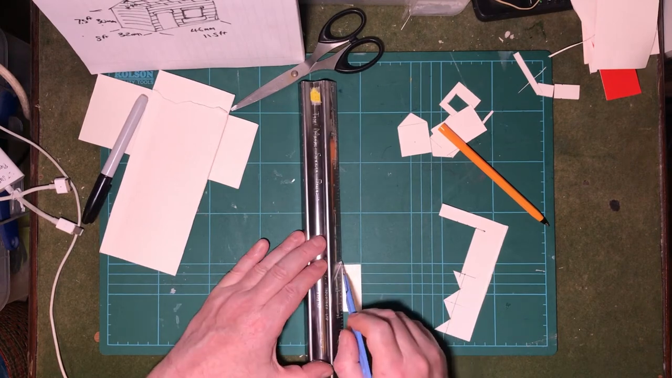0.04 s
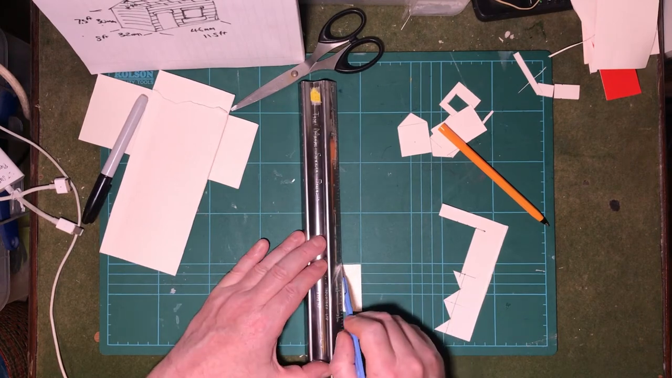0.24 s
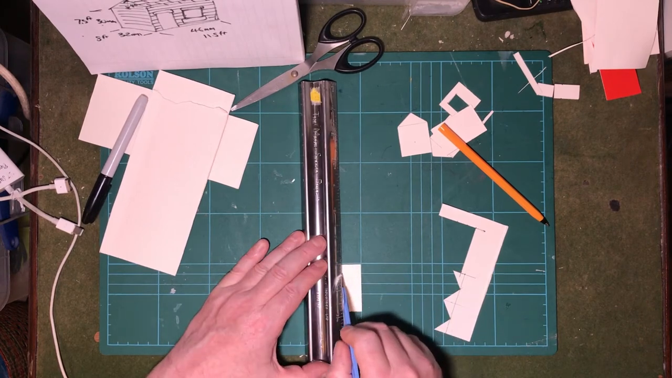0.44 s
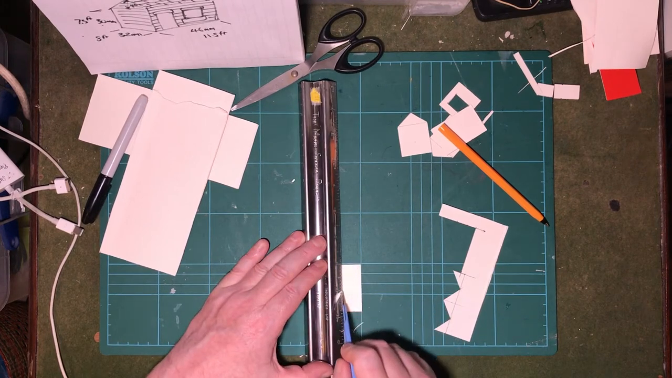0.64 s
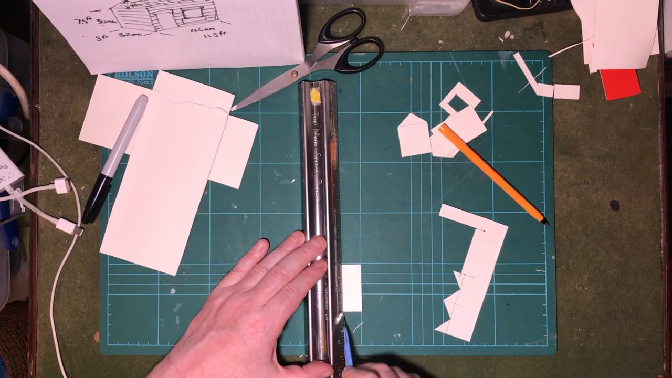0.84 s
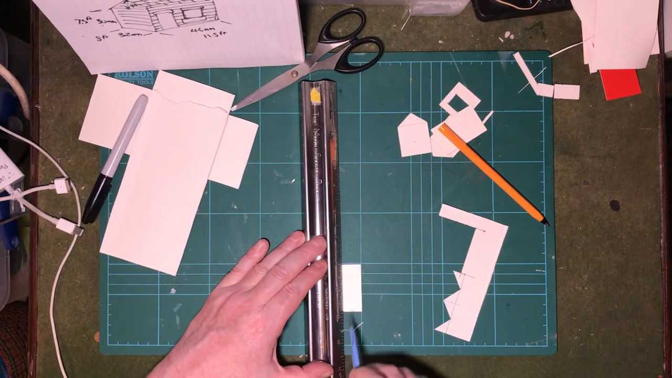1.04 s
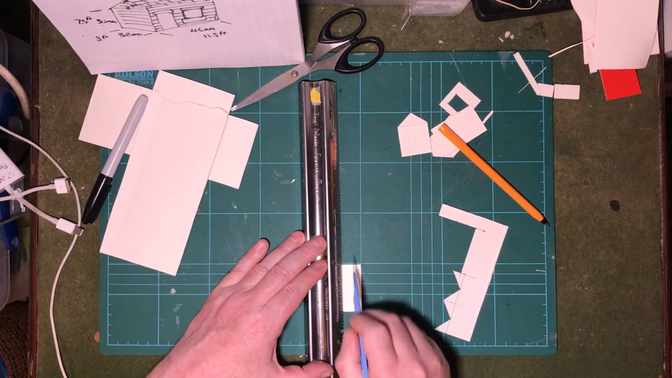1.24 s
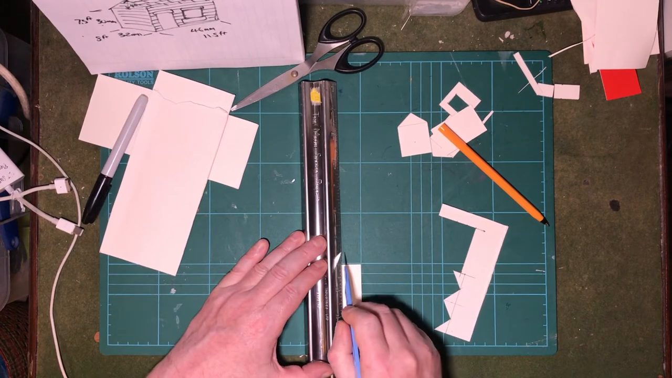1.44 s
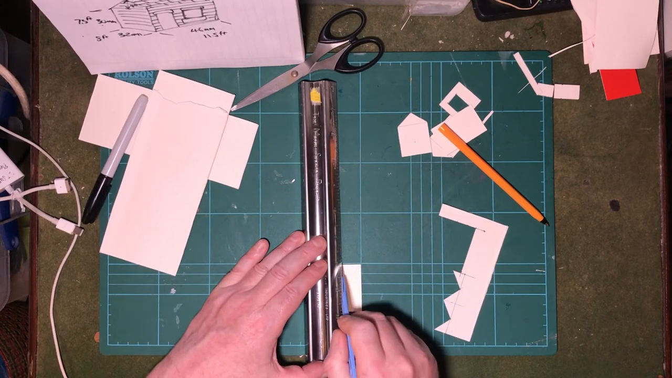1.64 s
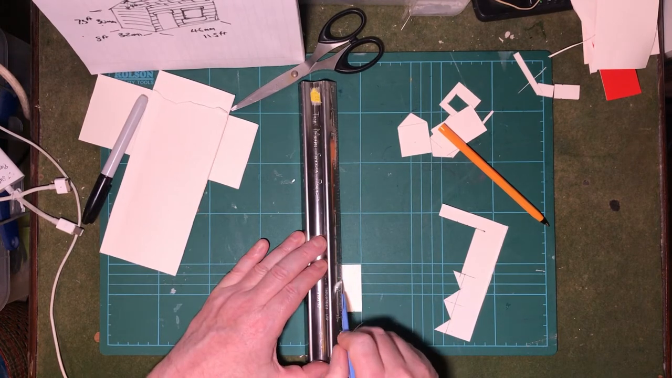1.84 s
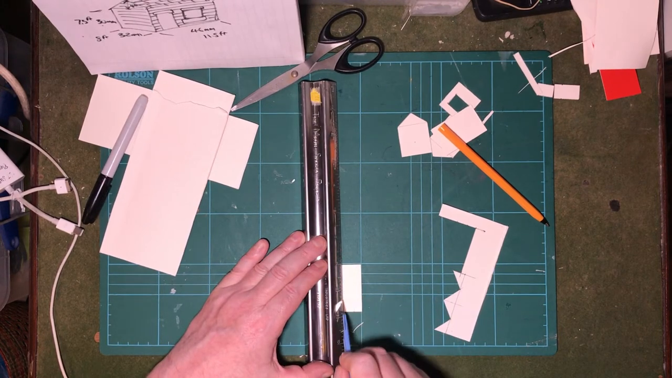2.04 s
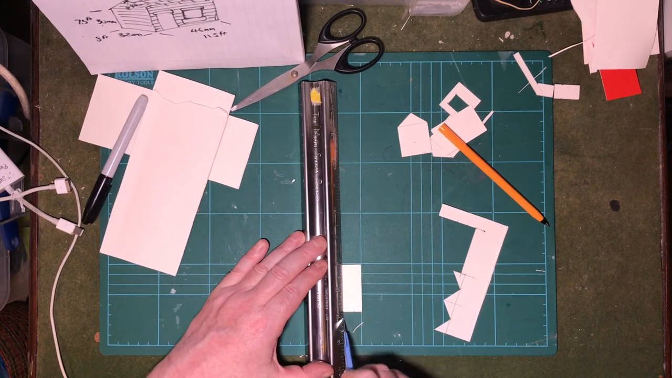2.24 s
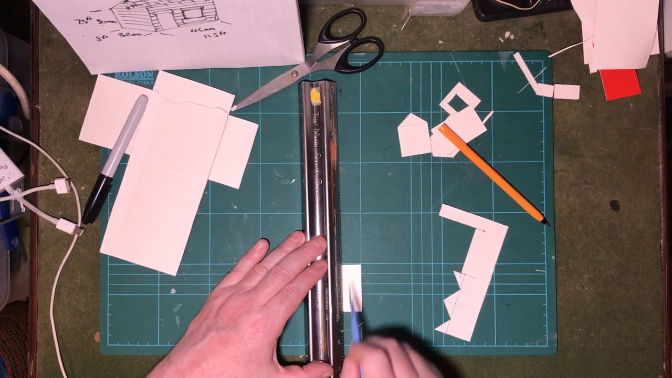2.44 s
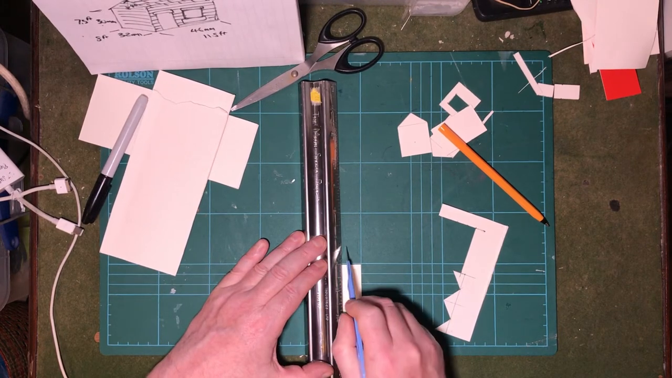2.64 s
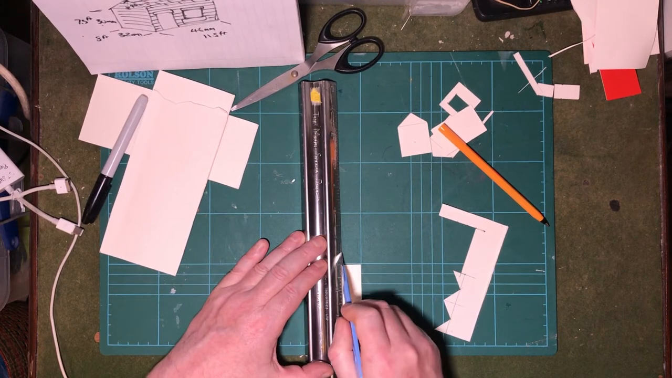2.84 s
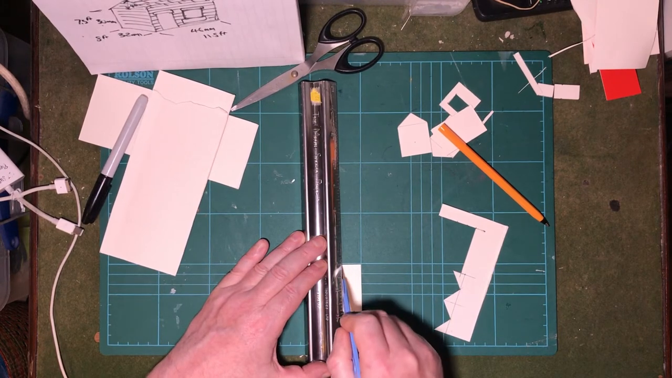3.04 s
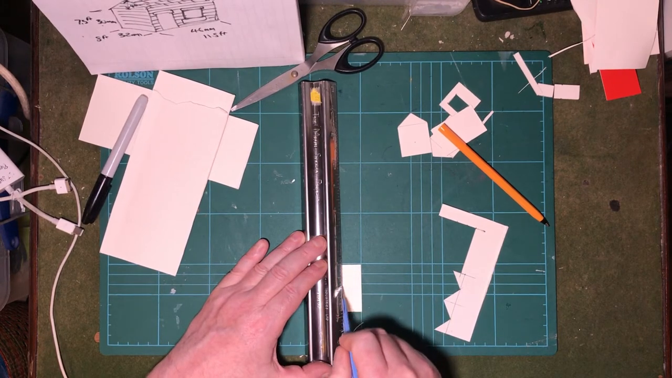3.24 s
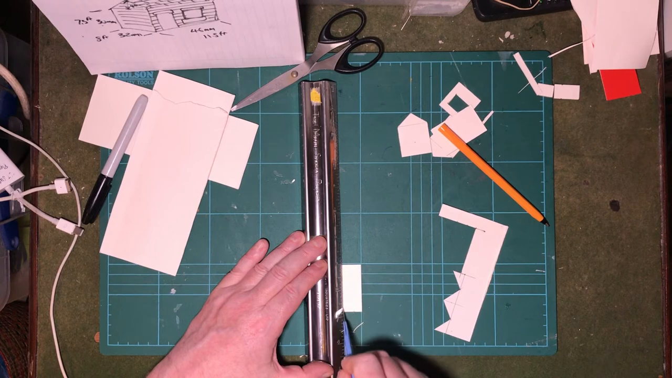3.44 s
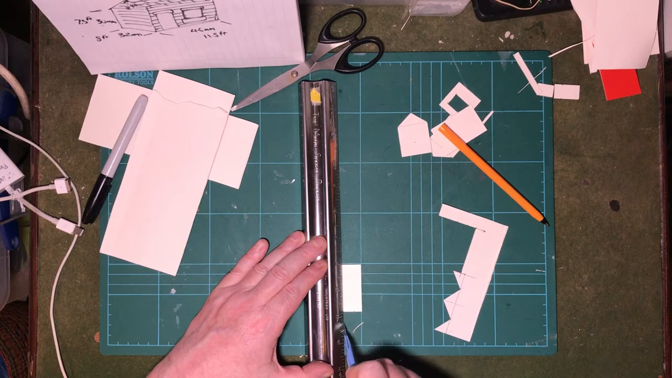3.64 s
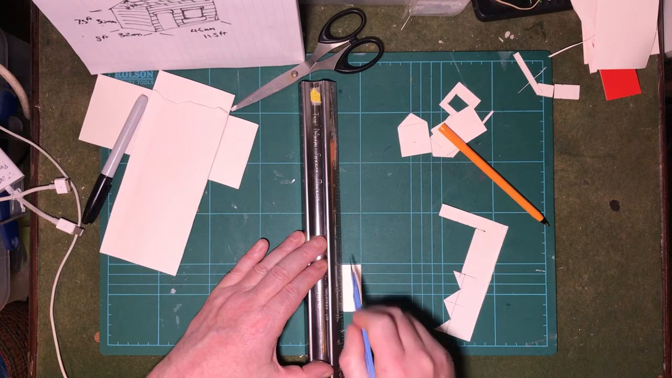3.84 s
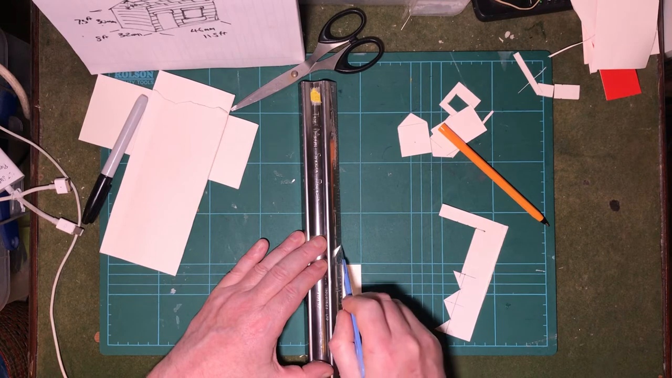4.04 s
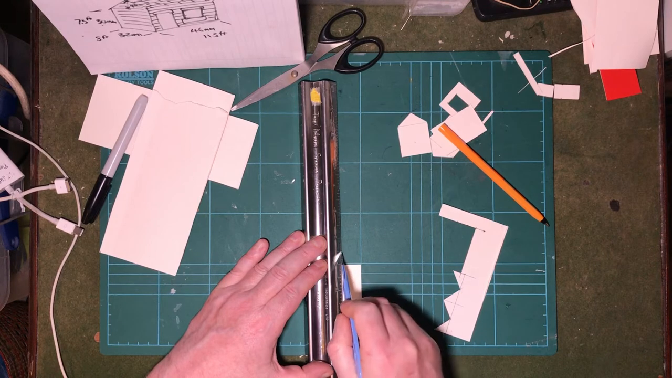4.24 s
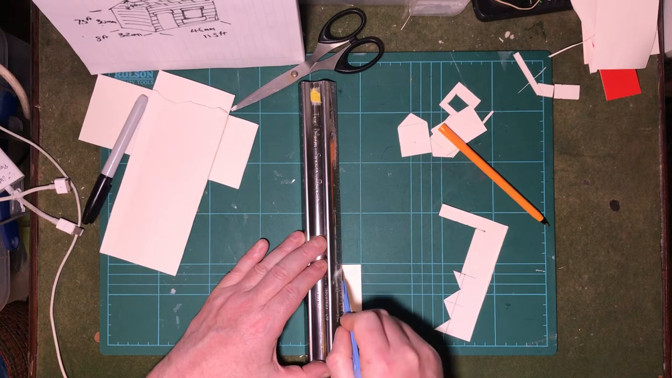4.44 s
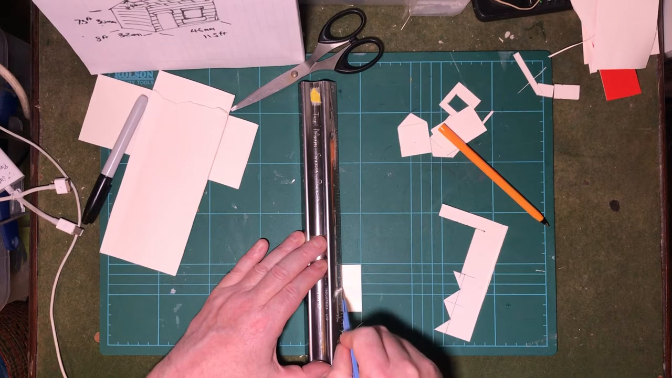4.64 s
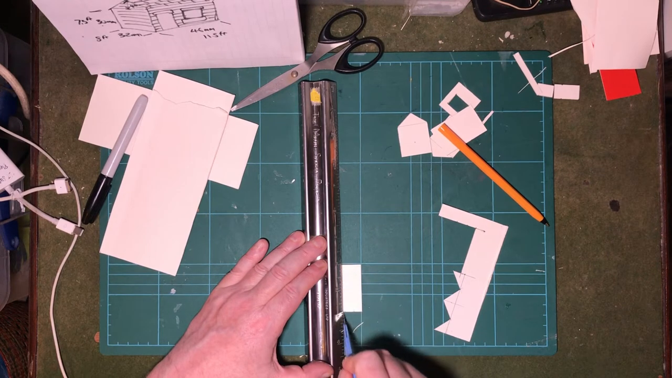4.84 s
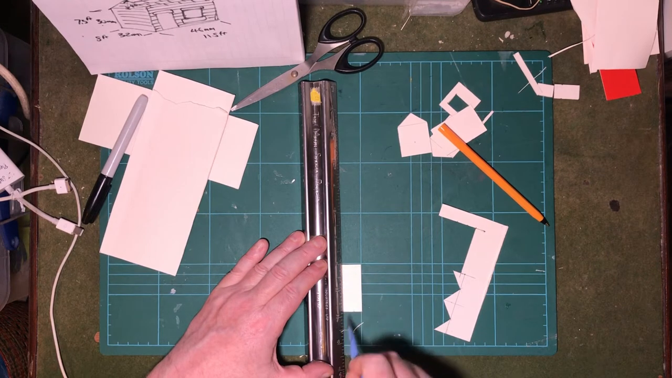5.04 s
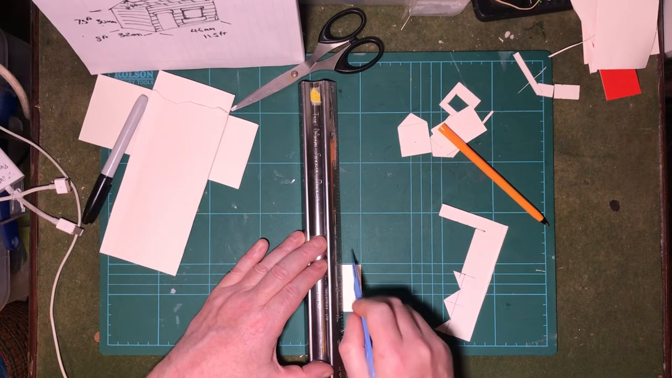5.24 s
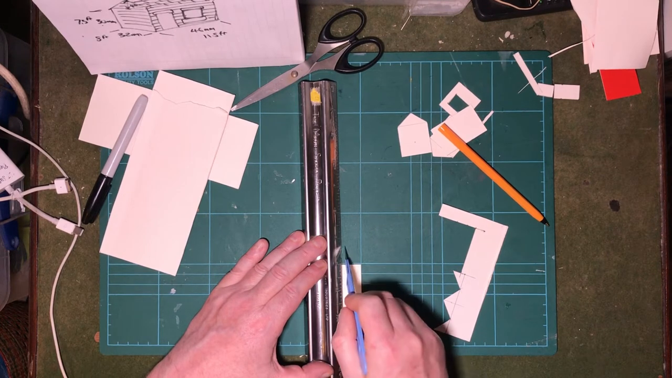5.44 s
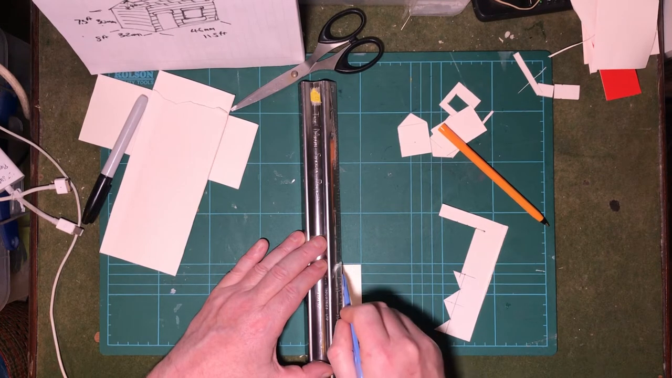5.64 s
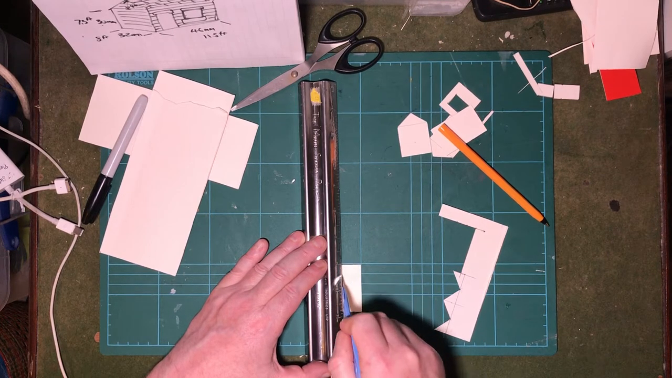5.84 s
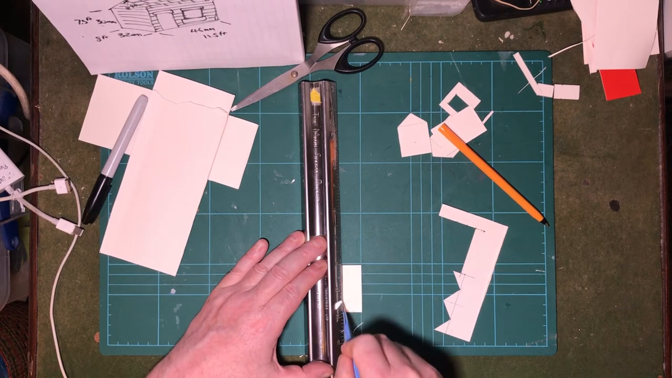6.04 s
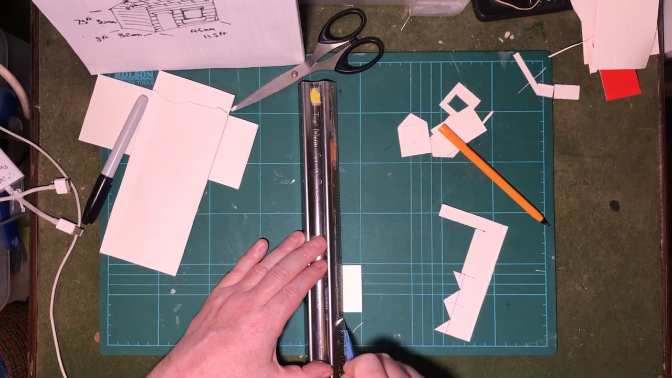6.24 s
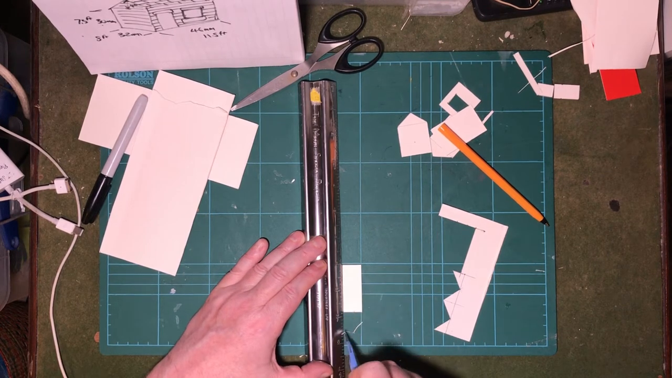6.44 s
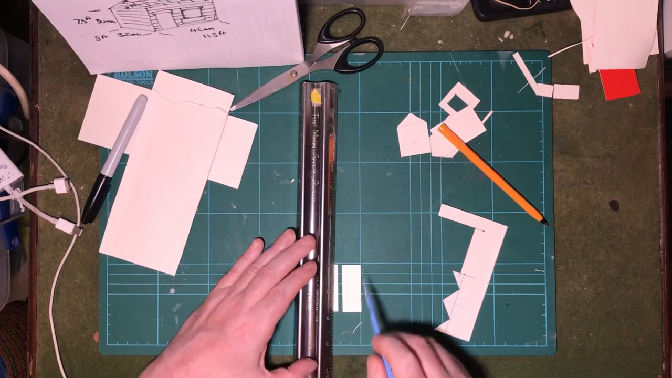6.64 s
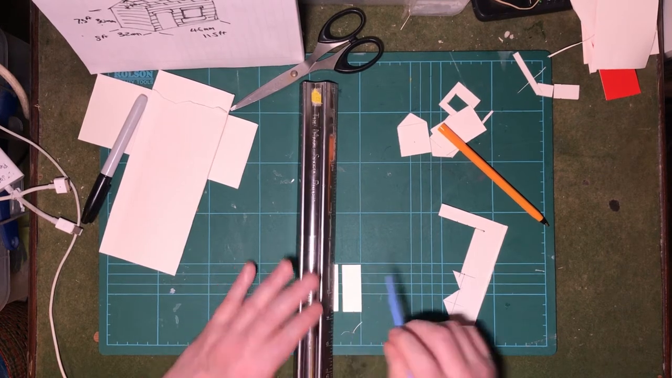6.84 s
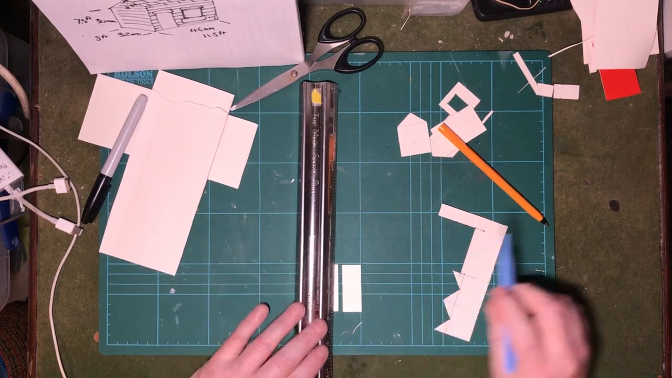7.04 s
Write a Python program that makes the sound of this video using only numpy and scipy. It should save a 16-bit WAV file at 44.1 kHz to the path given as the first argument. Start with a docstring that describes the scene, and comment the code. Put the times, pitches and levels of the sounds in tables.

```python
"""In a small room, a craft knife is drawn five times along a steel rule, through thin card on a cutting mat.
Shaped noise from dense random slips gives the scrape, the ploughed mat, the torn fibres and the desk rumble.
Gritty bursts through resonant bodies give ticks, snaps, knocks and a crack; damped sines give pings and skids.
At the end the rule is nudged and the hands slide away. Room murmur and microphone hiss lie beneath."""
import sys
import numpy as np
from scipy import signal
from scipy.fft import rfft, irfft, next_fast_len
from scipy.io import wavfile
from scipy.ndimage import uniform_filter1d, map_coordinates

SR = 44100
rng = np.random.default_rng(int(sys.argv[2]) if len(sys.argv) > 2 else 0)


def digitize_waveform(pressure):
    """Quantize a signal to 16-bit integers and store it at the path in sys.argv[1].

    Rows of a 2-D input are taken as channels; values are limited to [-1, 1].
    """
    field = np.atleast_2d(pressure).T
    bounded = np.clip(field, -1, 1)
    quanta = np.round(bounded * 32767).astype(np.int16)
    wavfile.write(sys.argv[1], SR, quanta)


N = 313110
TIME_S = np.arange(N) / SR

# Cuts. Each row: blade bites the card [s], bite length [s], lead-in [s], time from bite to mat [s],
# time in the card [s], run-out [s], force at the bite [dB], on reaching the mat [dB], on leaving [dB],
# resistance before the bite [dB], jolt of the bite [dB], tearing [dB], last flick [dB], desk shake [dB].
STROKES = [(0.289, 0.028, .13, 0.26, 0.506, 0.13, -13, -7, -1.5, -3, 6.5, 3.5, -5, -1),
           (1.65, 0.027, 0.16, .27, 0.451, 0.15, -7, -1, 0.5, -1, 0.5, 2.5, -5.5, .5),
           (2.991, .003, 0.24, 0.24, 0.44, 0.14, -2, 3.5, 1.5, -1.5, 2.5, -1, -5.5, -1),
           (4.354, 0.0031, 0.23, 0.18, 0.435, 0.15, -2.5, 0.5, -3.5, -1.5, 4.5, -3, -2, 1.5),
           (5.636, 0.019, 0.259, 0.29, .455, 0.072, -4, -2, -5.5, -3.5, 7, -4.5, -15, 2.5)]

# Contacts. Each row: start [s], level before the group gain [dB], contact decay [s], tilt [dB per octave].
# Steel ticks on steel.
STEEL_TICKS = [(1.4617, -34, 0.0014, -2), (1.481, -30, 0.0093, -3), (2.6765, -27, 0.01, -4),
               (2.698, -34, 0.015, -7), (2.7142, -36, 0.0028, -5.5), (3.582, -38.5, 0.0032, -1),
               (4.9367, -36.5, 0.0015, -1), (6.3688, -37, 0.003, -5), (6.5656, -37.5, .002, 24),
               (6.619, -44, 0.0011, 2)]
# Blade catches and snaps free.
BLADE_SNAPS = [(0.906, -48, 0.0076, 5), (2.0945, -39, 0.0047, -4.5), (2.2425, -50, 0.002, 2),
               (2.9912, -48.5, 0.0023, -4), (3.539, -47.5, 0.0097, -3), (3.957, -36.5, 0.0089, -3),
               (3.963, -35, .0022, -4.5), (3.9968, -44.5, 0.0076, -5), (4.68, -40.5, 0.0022, -8.5),
               (4.8664, -49.5, 0.0079, 0), (4.8998, -42, 0.015, -0.5), (5.5172, -49, 0.0024, -4.5),
               (5.5823, -52, 0.0024, -7), (5.8223, -41, 0.0027, -8)]
# Dull knocks on the rule and mat.
DULL_KNOCKS = [(1.343, -43, 0.00045, -1), (1.462, -41, 0.0055, 0), (2.5845, -45, 0.00086, -2),
               (2.68, -36, 0.0078, -1), (2.7145, -42, .004, .5), (3.964, -39, 0.0019, -1.5),
               (4.041, -50.5, 0.0022, 1), (5.2792, -42.5, 0.0019, -4.5), (6.3988, -33.5, 0.0053, 0),
               (6.481, -32.5, 0.0067, -3)]
# Blade breaks through the far edge of the card.
EDGE_BREAKS = [(0.7817, -25, 0.0007, 1), (0.7828, -21, .0016, -0.5)]

# Blade springs free and pings. Each row: start [s], level [dB].
BLADE_PINGS = [(3.581, -40), (3.966, -32), (4.939, -38)]
# Side of the hand skids in shudders. Each row: start [s], level before the group gain [dB],
# length [s], mean slip rate [slips per s].
HAND_SKIDS = [(1.79, -49, 0.03, 81), (1.91, -36, 0.027, 238), (5.821, -42.5, 0.013, 203),
              (5.948, -42.5, 0.022, 130), (6.036, -39, 0.013, 260), (6.324, -49.5, 0.027, 230),
              (6.693, -42.5, 0.029, 145), (6.711, -40.5, 0.018, 247)]

# Colours. Each row: frequency [Hz], relative level [dB].
# Modes, the resonances above a colour. Each row: centre [Hz], width [Hz], added resonant gain [dB].
# Blade on the rule: colour, modes.
SCRAPE_COLOUR = [(100, -27.5), (350, -1.5), (700, -4), (1150, -1.5), (1900, -10.5), (3300, -6.5),
                 (4500, -14), (6500, -10), (9000, -19.5), (16000, -22)]
SCRAPE_MODES = [(523, 16, 9.5), (868, 25, 3.5), (1140, 360, -3), (1565, 76, 7.5), (3060, 85, 14),
                (3516, 100, 10), (3810, 75, 10.5), (5700, 150, 9)]
# Blade in the mat: colour, modes.
GROOVE_COLOUR = [(100, -31), (400, -3), (800, -6.5), (1600, -6.5), (2400, -6.5), (3300, -15), (4600, -12),
                 (5900, -12), (7500, -17.5), (16000, -22)]
GROOVE_MODES = [(503, 23, 3.7), (1493, 47, 3.2), (2345, 79, 1), (2400, 65, 9.7), (5510, 110, 7.9),
                (5830, 220, 6.9)]
# Tearing card fibres: colour, modes.
FIBRE_COLOUR = [(500, -59), (3000, -2.5), (5500, -6), (8500, -5), (10000, -6.5), (13000, -0.5),
                (15000, -3.5), (16000, -46)]
FIBRE_MODES = [(6630, 110, 8), (7370, 230, 5.5), (9130, 120, 10), (8500, 540, 3)]
# Rumbling desk: colour, modes.
DESK_COLOUR = [(25, -40), (55, -3), (78, 4.5), (120, 1), (200, -3.5), (270, -12.5), (350, -4.5),
               (600, -24.5), (1500, -33.5)]
DESK_MODES = [(156.6, 27, -0.78)]
# Ticking steel: colour, modes.
STEEL_COLOUR = [(300, -27.5), (1400, -10.5), (2300, -12.5), (3600, 0), (5600, -2.5), (7000, 10), (8200, 1),
                (9300, -2), (10300, -1), (14000, 3.5), (16000, -12.5)]
STEEL_MODES = [(1372, 61, 10), (6680, 65, 4.1), (7150, 26, 1.3), (8080, 180, 12), (8600, 60, 2.1),
               (10100, 98, 8.1)]
# Snapping blade: colour, modes.
SNAP_COLOUR = [(200, -24), (1000, -7.5), (2000, -5), (3300, 2), (4600, 4), (5800, 6), (8000, 1.5),
               (16000, -8.5)]
SNAP_MODES = [(848, 54, 9.2), (2410, 84, 1.8), (3010, 140, 11.2), (3510, 110, 3.2)]
# Knocked rule and mat: colour, modes.
KNOCK_COLOUR = [(60, -8.5), (200, -7), (550, 0.5), (1000, 0), (1350, 4.5), (2100, -7.5), (2700, -16),
                (3600, -5), (8000, -22), (16000, -18)]
KNOCK_MODES = [(544, 12, 9.6), (890, 19, 0.84)]
# Rule chattering on the mat: colour, modes.
RULE_COLOUR = [(40, -6), (90, 13.5), (380, 4), (700, -11.5), (1300, 1), (1900, -14.5), (2600, -4.5),
               (3700, -17), (6500, -10.5), (10000, -23.5), (16000, -31)]
RULE_MODES = [(1126, 87, 1.9), (1456, 11, 17.6), (1470, 60, 2.6), (2247, 43, 17), (2700, 96, 2.8),
              (3120, 46, 20), (3544, 48, 10.5), (3960, 100, 9.4), (5200, 20, 15), (6420, 25, 11),
              (7520, 29, 8.3)]
# Colours alone: sliding skin, its hiss, knife tip on the mat, crack of the card edge, room murmur and hiss.
SKIN_COLOUR = [(22, 22.5), (45, -4), (130, 14.5), (300, 2), (450, -4), (900, -8), (1300, -0.5),
               (1600, -9.5), (2000, -0.5), (3200, -7), (4100, -9.5), (4600, -8), (5600, -16), (16000, -20)]
SKIN_HISS_COLOUR = [(2000, -5.5), (5500, -1), (8500, -6), (11000, -13), (16000, -27)]
TIP_COLOUR = [(200, -3), (520, 0), (700, -5), (1400, -2), (2300, -2), (4200, -11), (6200, -9),
              (10000, -20.5), (16000, -24)]
BREAK_COLOUR = [(200, -22.5), (900, -21.5), (1500, -7), (2600, -9), (3300, -2.5), (4600, -11), (5300, 1.5),
                (5900, 0), (6800, -9), (16000, -21)]
FLOOR_COLOUR = [(20, 2.5), (30, -50), (55, -20.5), (75, -10), (140, -13.5), (220, -18.5), (420, -28.5),
                (900, -30.5), (1500, -33), (5000, -36.5), (8000, -34), (12100, -30.5), (16000, -36)]

# Single rubs. Each row: start [s], attack [s], hold [s], decay [s].
# Blade brushes the rule before the first cut.
FALSE_START = (0.173, 0.04, 0.0084, 0.0085)
# Knife tip drags off the mat.
TIP_DRAG = (6.185, 0.051, 0.037, 0.02)
# Rule breaks loose, then shifts on the mat.
RULE_JERK = (6.397, 0.0017, 0.0077, .008)
RULE_SHIFT = (6.40, 0.027, 0.015, 0.049)
# Hands slide away, fingertips leave the rule, palm brushes the mat.
HAND_SLIDE = (6.667, 0.0063, 0.38, .9)
FINGER_PEEL = (6.667, 0.0013, .01, 0.043)
PALM_BRUSH = (6.75, 0.068, 0.031, 0.027)

# Hand leans in before the bite, eases off after the card.
TOUCH_DB, EASE_DB, LIFT_S = -11, -11, 0.015
# Less resistance past the card; coming out takes a moment.
RUN_OUT_DB, EXIT_S = -3.5, 0.018
# Jolt of the bite dies away; far edge of the card holds the blade briefly.
JOLT_DECAY_S, EDGE_DB, EDGE_WIDTH_S = 0.036, -3.5, 0.016
# Last flick swells just before the lift.
FLICK_LEAD_S, FLICK_WIDTH_S = 0.036, 0.027
# Tip sinks into the mat: groove grows, scrape gives way, tearing thins out.
SINK_S, SHALLOW_DB, SUNK_SCRAPE_DB = 0.075, -9, -2.5
SUNK_TEAR_DB, TEAR_FADE_DB_PER_S = -1.5, -9


def undb(db):
    """Decibels to gain."""
    return 10 ** (np.asarray(db) / 20)


def unit(x):
    """Scale to rms 1."""
    return x / np.sqrt(np.mean(x ** 2) + 1e-20)


def walk(rate_hz):
    """Smooth random wandering, rms 1."""
    hold = max(int(SR / rate_hz), 1)
    steps = np.repeat(rng.standard_normal(N // hold + 1), hold)
    return unit(uniform_filter1d(steps, hold)[:N])


def rise(start_s, length_s):
    """Straight fade from 0 to 1."""
    return np.clip((TIME_S - start_s) / length_s, 0, 1)


def swell(peak_s, width_s):
    """Smooth bump of height 1."""
    return np.exp(-((TIME_S - peak_s) / width_s) ** 2)


def rub(start_s, attack_s, hold_s, decay_s):
    """Envelope of one rub: linear attack, hold, exponential decay."""
    since_hold_s = np.maximum(TIME_S - start_s - attack_s - hold_s, 0)
    return rise(start_s, attack_s) * np.exp(-since_hold_s / decay_s)


def add(out, start_s, sound):
    """Mix a short sound into out."""
    start = int(start_s * SR)
    out[start:start + len(sound)] += sound[:N - start]


def high_pass(x, cutoff_hz):
    """Second-order low cut."""
    return signal.sosfilt(signal.butter(2, cutoff_hz, "high", fs=SR, output="sos"), x)


def body(x, colour, modes=(), tilt_db_per_octave=0):
    """Filter x by a minimum-phase colour with ringing resonances on top; rms 1."""
    size = 2 * next_fast_len(len(x) // 2 + 1)
    f_hz = np.maximum(np.arange(size // 2 + 1) * SR / size, 1)
    hz, db = np.transpose(colour)
    octaves = np.log2(np.maximum(f_hz, hz[0]) / hz[0])
    colour_db = np.interp(np.log(f_hz), np.log(hz), db) + tilt_db_per_octave * octaves
    # folding the cepstrum makes the colour causal
    cepstrum = irfft(np.log(undb(colour_db)))
    cepstrum[1:size // 2] *= 2
    cepstrum[size // 2 + 1:] = 0
    ring = 1
    for centre_hz, width_hz, peak_db in modes:
        damping = 1j * f_hz * width_hz
        ring = ring + undb(peak_db) * damping / (centre_hz ** 2 - f_hz ** 2 + damping)
    return unit(irfft(rfft(x, size) * np.exp(rfft(cepstrum)) * ring)[:len(x)])


def friction(slips_per_s, spread_db):
    """Dense tiny slips: random impulses of either sign and uneven size."""
    slips = rng.random(N) < slips_per_s / SR
    return slips * rng.choice([-1, 1], N) * undb(spread_db * rng.standard_normal(N))


def drift(x, depth=0.014, rate_hz=7):
    """Resonances wander as the point of contact travels: playback speed varies."""
    place = np.arange(N) + np.cumsum(depth * walk(rate_hz))
    return map_coordinates(x, [place], order=3, mode="mirror")


def room_floor(level_db=-56):
    """Low room murmur and microphone hiss: steady coloured noise."""
    return undb(level_db) * body(rng.standard_normal(N), FLOOR_COLOUR)


def room(x, t60_s=0.19, wet_db=-13, near_db=-10, near_decay_s=0.0017):
    """Things on the desk scatter the treble; then the short tail of a furnished room."""
    t_s = TIME_S[:SR // 3]
    near = rng.standard_normal(len(t_s)) * np.exp(-t_s / near_decay_s) * (t_s > 0.002)
    near = high_pass(near, 1000)
    tail = rng.standard_normal(len(t_s)) * np.exp(-np.log(1000) * t_s / t60_s) * (t_s > 0.007)
    echoes = (undb(near_db) * unit(near) + undb(wet_db) * unit(tail)) / np.sqrt(len(t_s))
    return x + signal.fftconvolve(x, echoes)[:N]


def letting_go(jerk_db=-34, rule_db=-33.5, skin_db=-51, palm_db=-56, peel_db=-46, brush_db=-57):
    """Rule chatters over the mat and rings; skin brushes away over mat and card."""
    shift = undb(jerk_db) * rub(*RULE_JERK) + undb(rule_db) * rub(*RULE_SHIFT)
    slide = undb(skin_db) * rub(*HAND_SLIDE) + undb(palm_db) * rub(*PALM_BRUSH)
    hiss = undb(peel_db) * rub(*FINGER_PEEL) + undb(brush_db) * rub(*PALM_BRUSH)
    rule = body(friction(6000, 1.8), RULE_COLOUR, RULE_MODES)
    skin = body(friction(12000, 2.6), SKIN_COLOUR)
    skin_hiss = body(friction(4000, 2), SKIN_HISS_COLOUR)
    return shift * rule + slide * skin + hiss * skin_hiss


def skids(gain_db=-7, thud_hz=255, thud_decay_s=0.0021, jitter=0.211):
    """Skin sticks and slips on the mat; every slip is a damped thud in the desk."""
    out, t_s = np.zeros(N), TIME_S[:SR // 8]
    thud = np.sin(2 * np.pi * thud_hz * t_s) * np.exp(-t_s / thud_decay_s)
    for start_s, level_db, length_s, slips_per_s in HAND_SKIDS:
        chance = rng.standard_normal((16, 2))
        slips_s = np.cumsum(np.abs(1 + jitter * chance[:, 0])) / slips_per_s
        shudder = np.zeros(len(t_s))
        for at_s, size in zip(slips_s - slips_s[0], chance[:, 1]):
            fade = np.clip((length_s - at_s) * slips_per_s, 0, 1)
            shudder += undb(2 * size) * fade * np.interp(t_s - at_s, t_s, thud, left=0)
        # the desk top radiates almost no deep bass
        add(out, start_s, undb(level_db + gain_db) * unit(high_pass(shudder, 70)))
    return out


def pings(bending_hz=4110, t60_s=0.037):
    """Thin blade rings briefly in its bending mode: a damped sine."""
    out, t_s = np.zeros(N), TIME_S[:SR // 4]
    ring = np.sin(2 * np.pi * bending_hz * t_s) * np.exp(-np.log(1000) * t_s / t60_s)
    for start_s, level_db in BLADE_PINGS:
        add(out, start_s, undb(level_db) * ring)
    return out


def hits(rows, colour, modes, gain_db):
    """Each contact is a brief gritty burst that rings the struck body."""
    out, t_s = np.zeros(N), TIME_S[:SR // 8]
    attack = 1 - np.exp(-(t_s / 0.0008) ** 2)
    for start_s, level_db, decay_s, tilt in rows:
        burst = rng.choice([-1, 1], len(t_s)) * attack * np.exp(-t_s / decay_s)
        add(out, start_s, undb(level_db + gain_db) * body(burst, colour, modes, tilt))
    return out


def stroke(bite_s, entry_s, lead_s, sink_s, cut_s, run_s, bite_db, mat_db, leave_db,
           approach_db, jolt_db, tear_db, flick_db, shake_db):
    """Hand force through one cut sets four gains: on the rule, in the mat, in the card, on the desk."""
    touch_s, mat_s, leave_s = bite_s - lead_s, bite_s + sink_s, bite_s + cut_s
    lift_s = leave_s + run_s
    contact = rise(touch_s, LIFT_S) * (1 - rise(lift_s, LIFT_S))
    force_db = np.interp(TIME_S, [touch_s, bite_s, mat_s, leave_s, lift_s],
                         [bite_db + TOUCH_DB, bite_db, mat_db, leave_db, leave_db + EASE_DB])
    force = contact * undb(force_db)

    bitten = rise(bite_s, entry_s)
    sunk = rise(mat_s - SINK_S, SINK_S)
    past_card = rise(leave_s, EXIT_S)
    load = force * undb(approach_db * (1 - bitten) + RUN_OUT_DB * past_card)
    jolt = undb(jolt_db * rub(bite_s, entry_s, JOLT_DECAY_S, JOLT_DECAY_S))
    edge = undb(EDGE_DB) * swell(leave_s - EDGE_WIDTH_S / 2, EDGE_WIDTH_S)
    flick = contact * undb(flick_db) * swell(lift_s - FLICK_LEAD_S, FLICK_WIDTH_S)
    thinning_db = TEAR_FADE_DB_PER_S * np.maximum(TIME_S - mat_s, 0)
    tearing = undb(tear_db + SUNK_TEAR_DB * sunk + thinning_db)

    on_rule = load * jolt * undb(SUNK_SCRAPE_DB * sunk)
    in_mat = load * (undb(SHALLOW_DB * (1 - sunk)) + edge) + flick
    in_card = force * np.sqrt(jolt) * tearing * bitten * (1 - past_card)
    on_desk = force * undb(shake_db)
    return on_rule, in_mat, in_card, on_desk


def cutting(scrape_db=-48, groove_db=-48, fibre_db=-50.5, rumble_db=-49, tip_db=-43.5,
            false_start_db=-12, catch_db=1.96, wobble_db=0.66, patch_db=1.0):
    """Blade scrapes the rule, ploughs the mat and tears fibres; its drag shakes the desk."""
    on_rule, in_mat, in_card, on_desk = np.sum([stroke(*row) for row in STROKES], axis=0)
    on_rule = on_rule + undb(false_start_db) * rub(*FALSE_START)
    grip = undb(catch_db * walk(260))  # uneven card holds and frees the blade
    lean = undb(wobble_db * walk(35))  # knife rocks between the rule's edge and the card
    patches = undb(patch_db * walk(22))  # thicker and thinner clumps of fibre

    scrape = drift(body(grip * lean * friction(9000, 2.9), SCRAPE_COLOUR, SCRAPE_MODES))
    groove = drift(body(grip * friction(3500, 3.8), GROOVE_COLOUR, GROOVE_MODES))
    fibres = body(grip * patches * friction(6000, 4.2), FIBRE_COLOUR, FIBRE_MODES)
    rumble = body(friction(2500, 2.3), DESK_COLOUR, DESK_MODES)
    tip = body(friction(6000, 3.1), TIP_COLOUR)
    return (undb(scrape_db) * on_rule * scrape
            + undb(groove_db) * in_mat * groove
            + undb(fibre_db) * in_card * fibres
            + undb(rumble_db) * on_desk * rumble
            + undb(tip_db) * rub(*TIP_DRAG) * tip)


def scene():
    """All the handwork in the room, over the murmur and hiss."""
    ticks = hits(STEEL_TICKS, STEEL_COLOUR, STEEL_MODES, gain_db=-13.5)
    snaps = hits(BLADE_SNAPS, SNAP_COLOUR, SNAP_MODES, gain_db=-12)
    crack = hits(EDGE_BREAKS, BREAK_COLOUR, (), gain_db=-16)
    knocks = hits(DULL_KNOCKS, KNOCK_COLOUR, KNOCK_MODES, gain_db=-14.5)
    contacts = ticks + snaps + crack + knocks + pings()
    handwork = cutting() + contacts + skids() + letting_go()
    return (room(handwork) + room_floor())[None]


def record(dry, top_hz=16100):
    """Recorder cuts the top: a steep elliptic low-pass."""
    return signal.sosfilt(signal.ellip(10, 0.2, 70, top_hz, fs=SR, output="sos"), dry)


dry = scene()
out = record(dry)
digitize_waveform(out)
```